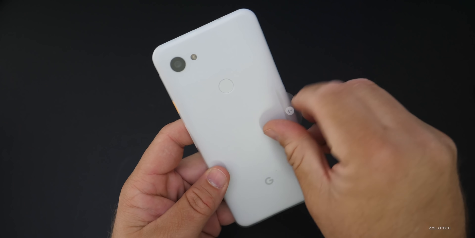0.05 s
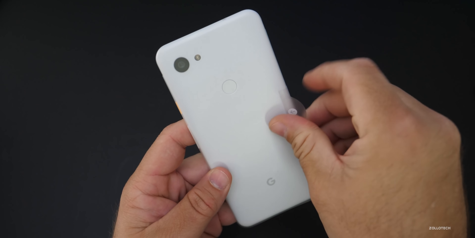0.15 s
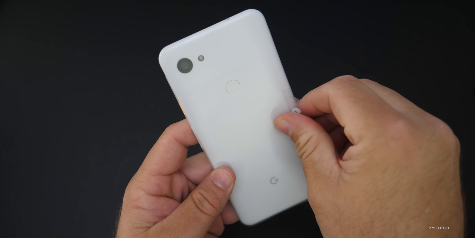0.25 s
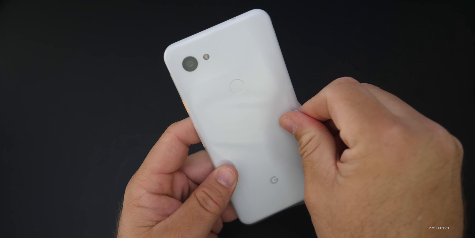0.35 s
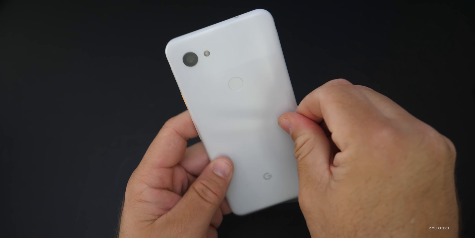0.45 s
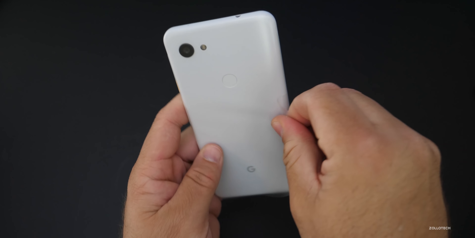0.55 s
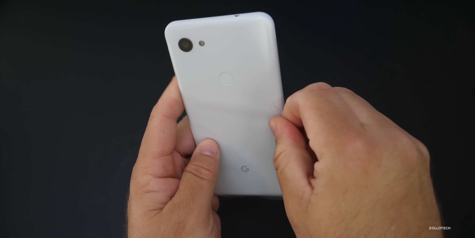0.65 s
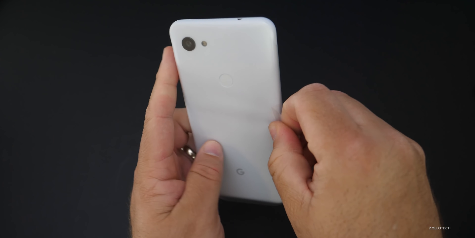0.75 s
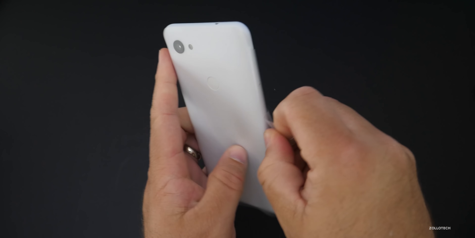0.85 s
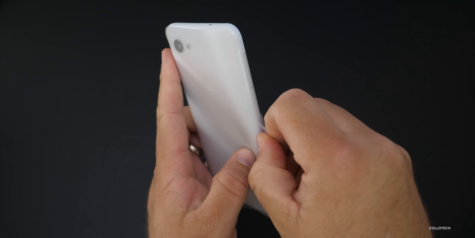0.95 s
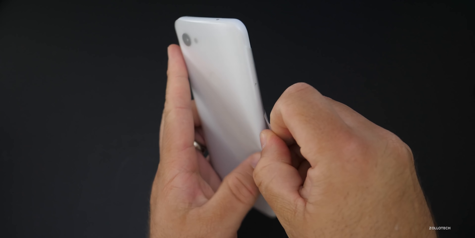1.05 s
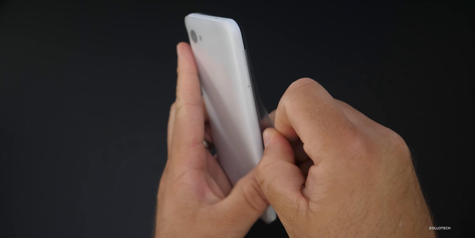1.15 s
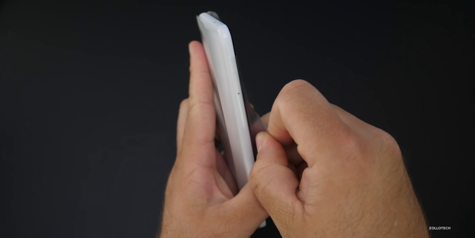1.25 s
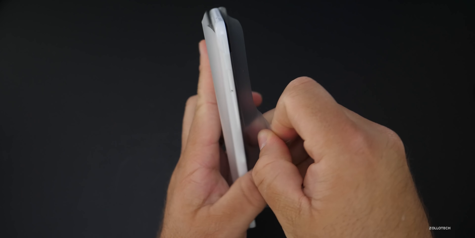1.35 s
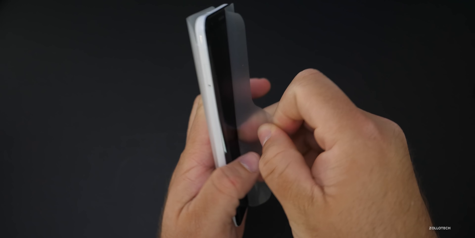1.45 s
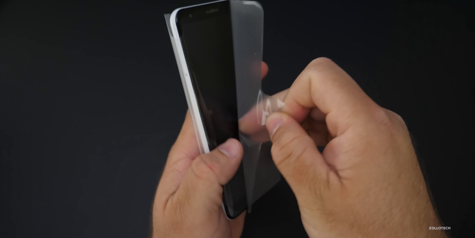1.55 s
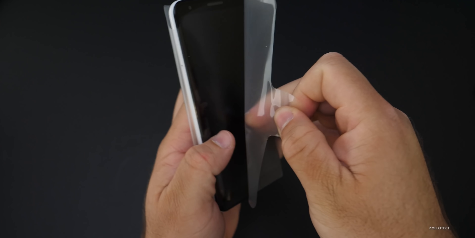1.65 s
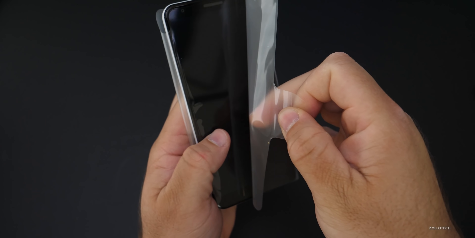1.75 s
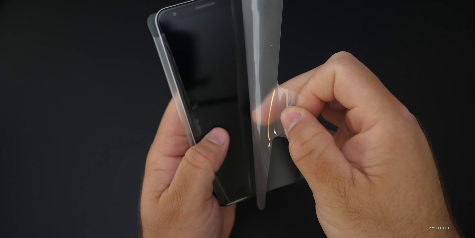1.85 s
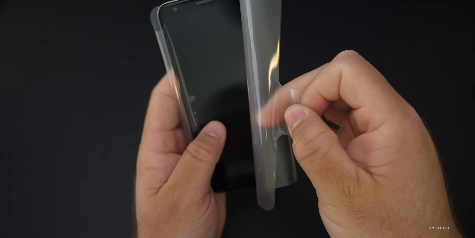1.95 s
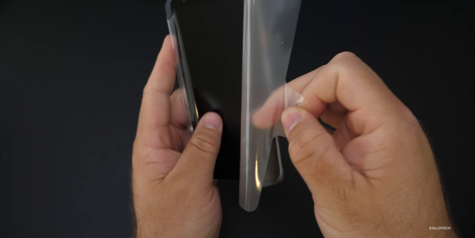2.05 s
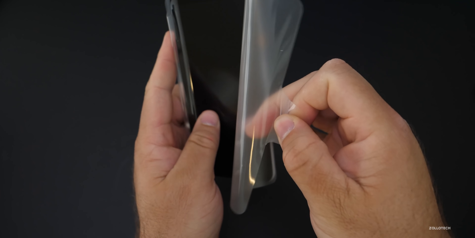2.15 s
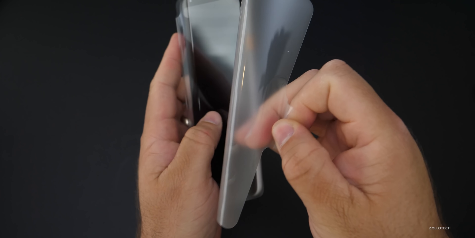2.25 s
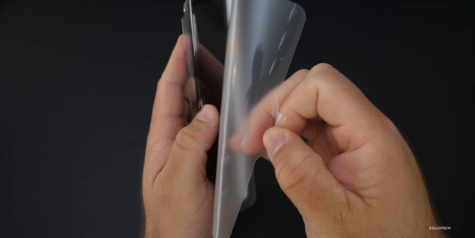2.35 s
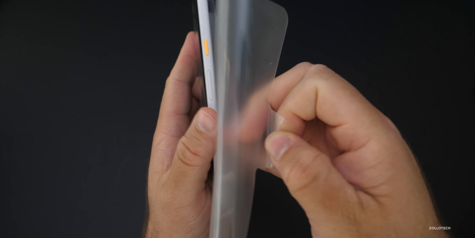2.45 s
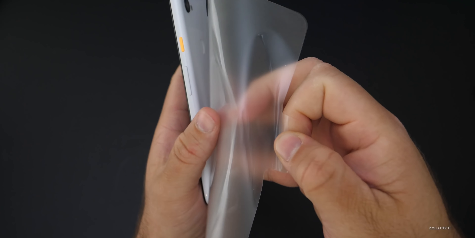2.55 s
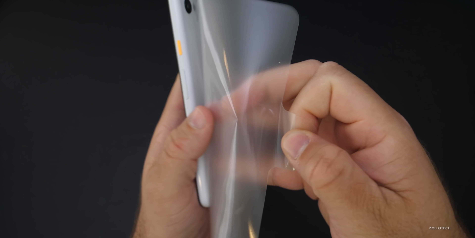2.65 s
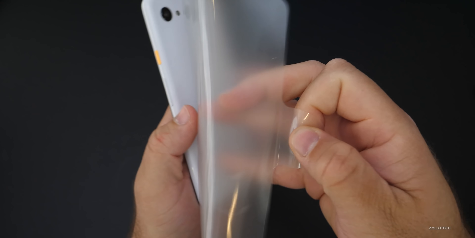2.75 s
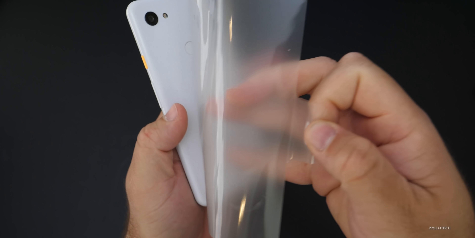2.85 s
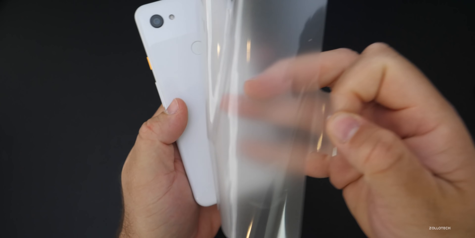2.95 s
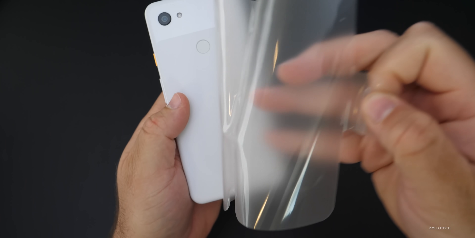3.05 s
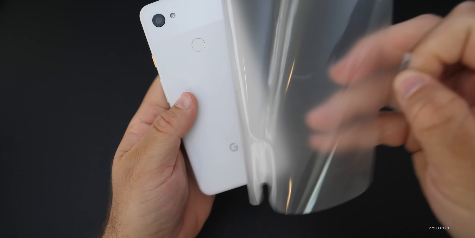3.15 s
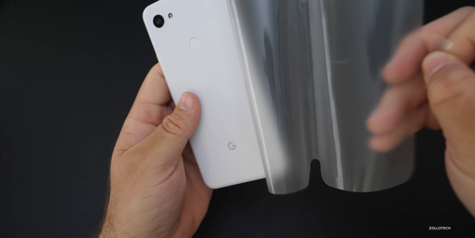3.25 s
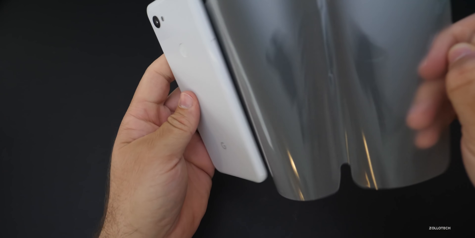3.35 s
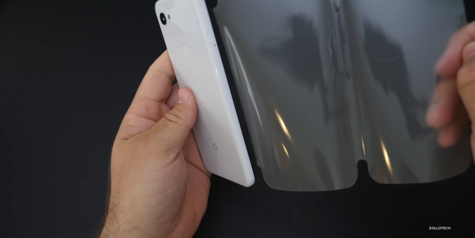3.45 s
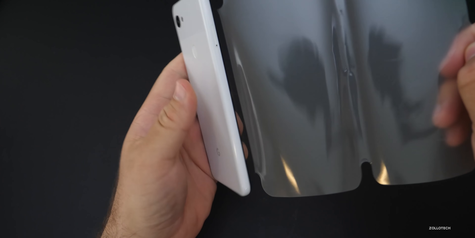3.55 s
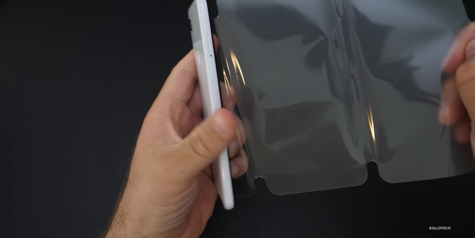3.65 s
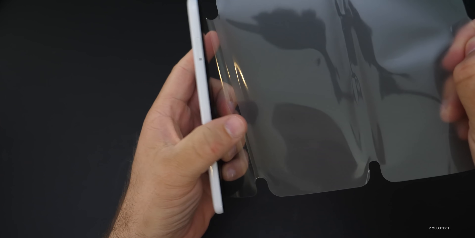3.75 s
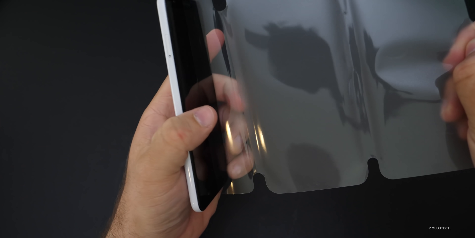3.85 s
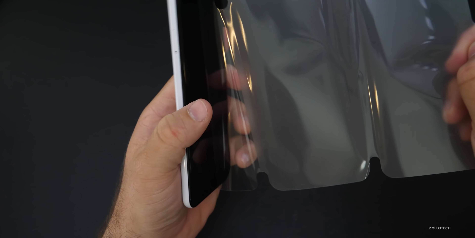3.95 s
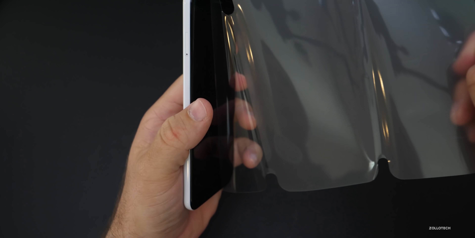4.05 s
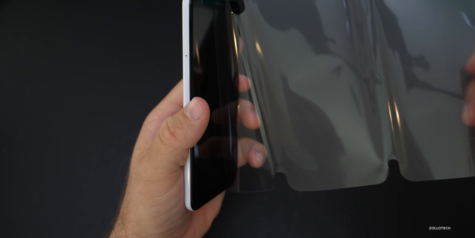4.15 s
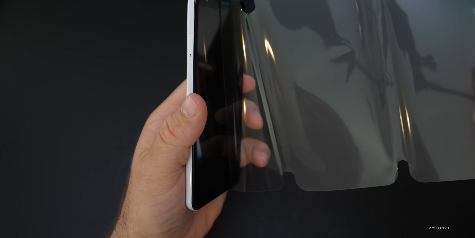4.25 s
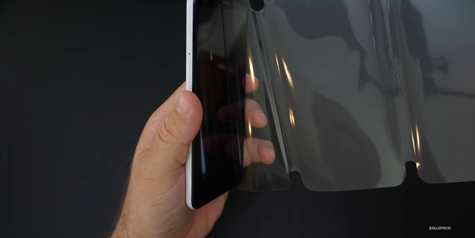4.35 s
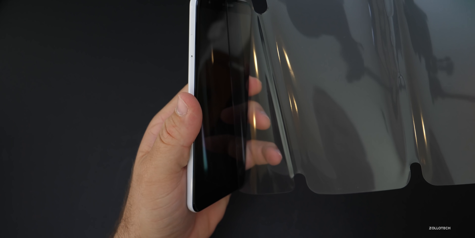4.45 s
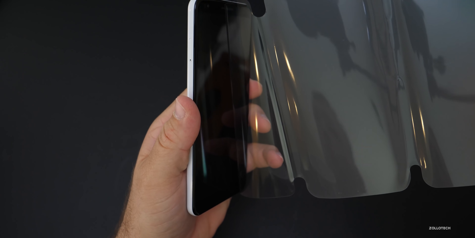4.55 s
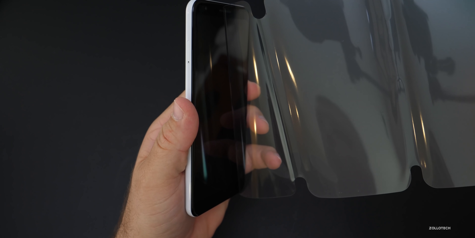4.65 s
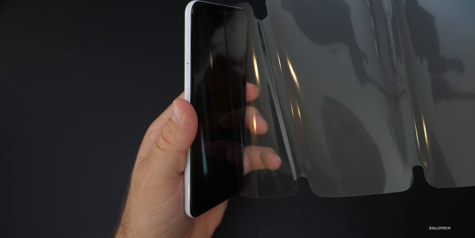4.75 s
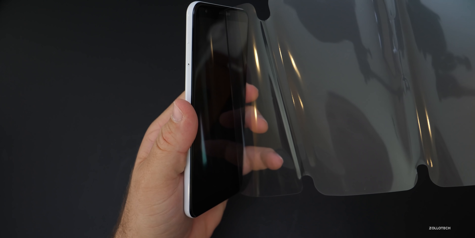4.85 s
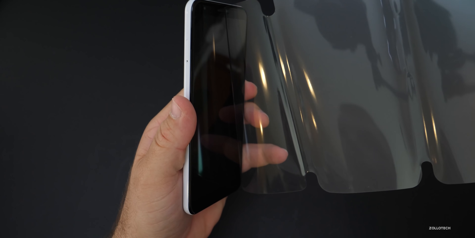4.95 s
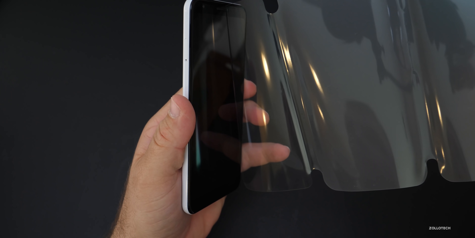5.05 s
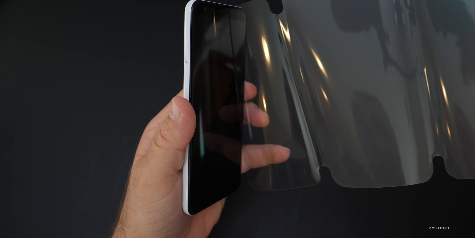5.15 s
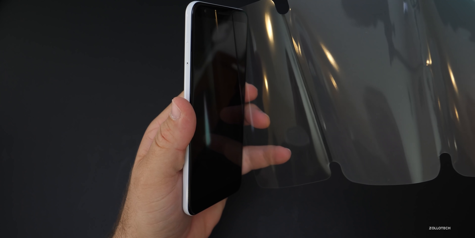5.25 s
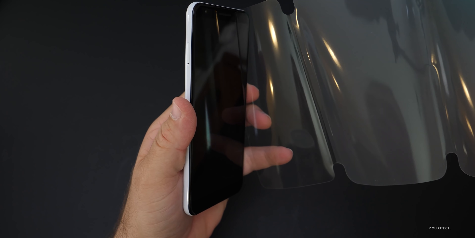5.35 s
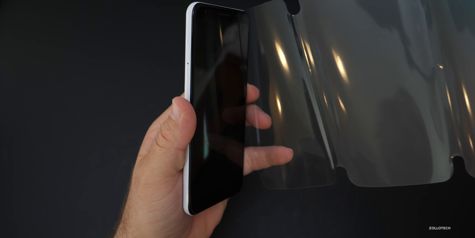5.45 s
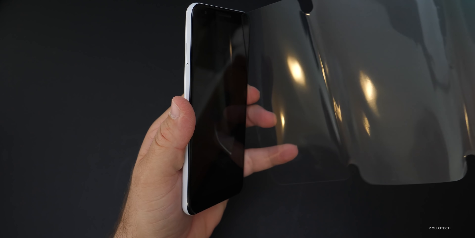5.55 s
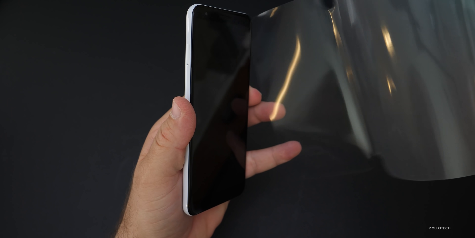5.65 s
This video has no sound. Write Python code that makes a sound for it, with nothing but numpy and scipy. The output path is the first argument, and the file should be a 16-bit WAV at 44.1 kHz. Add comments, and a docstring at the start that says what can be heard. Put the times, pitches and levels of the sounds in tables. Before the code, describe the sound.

Stiff clear plastic film snaps, crumples and rubs as it is pulled off a phone, then peels slowly in a fine run of tiny ticks.

```python
"""A clear plastic wrap is picked off a new phone, close to a microphone in a quiet small room.
First the stiff film snaps and crumples in pulses and bursts of noise; dull knocks ring the case, hands bump it.
Shoves of friction grains slide it over fingers and case, gliding bands of noise sing, and near 2.7 s it judders.
From about 4 s it peels slowly off the glass in a run of tiny ticks and larger pops, over a faint fizz.
A low mains hum, a sum of sines, and soft room noise lie underneath throughout."""
import sys
import numpy as np
from scipy import signal
from scipy.fft import rfft, irfft, next_fast_len
from scipy.io import wavfile
from scipy.ndimage import uniform_filter1d, map_coordinates

SR = 44100
rng = np.random.default_rng(int(sys.argv[2]) if len(sys.argv) > 2 else 0)


def put_to_file(sound):
    """Save the sound as 16-bit audio at rate SR, in the file named by the first command-line argument."""
    columns = np.atleast_2d(sound).T  # one column per channel
    safe = np.clip(columns, -1, 1)
    whole_steps = np.round(safe * 32767)
    wavfile.write(sys.argv[1], SR, whole_steps.astype(np.int16))


N = 251149
TIME = np.arange(N) / SR
LIFE = TIME[:SR // 4]  # the time axis of one decaying event


def amp(db):
    """Level: decibels become an amplitude ratio."""
    return 10 ** (np.asarray(db) / 20)


def unit(x):
    """Normalization by energy: scale to rms 1."""
    return x / np.sqrt(np.mean(x ** 2) + 1e-20)


def crest(x):
    """Normalization by peak: scale to a largest magnitude of 1."""
    return x / (np.abs(x).max() + 1e-20)


def along(points, hz):
    """Spectral interpolation: (Hz, value) points read on a logarithmic frequency axis."""
    point_hz, value = np.transpose(points)
    return np.interp(np.log(hz + 1), np.log(point_hz + 1), value)


def curves(rows):
    """Control curves: one value per sample for each column after the time."""
    time_s, *columns = np.transpose(rows)
    return [np.interp(TIME, time_s, column) for column in columns]


def during(rows, fade):
    """Gating: 1 while a table lasts, fading to 0 over fade seconds outside it."""
    first, last = rows[0][0], rows[-1][0]
    return np.interp(TIME, [first - fade, first, last, last + fade], [0, 1, 1, 0])


def add(track, s, x):
    """Superposition: mix x into the track from time s on."""
    start = max(round(s * SR), 0)
    part = track[start:start + len(x)]
    part += x[:len(part)]


def click(colour, ring_hz=1000, ring_db=0, width=1, size=2048):
    """Minimum phase: the causal pulse of a spectrum, peak 1, with one resonance (width in octaves)."""
    hz = np.fft.rfftfreq(size, 1 / SR)
    resonance = ring_db / (1 + (np.log2((hz + 1) / ring_hz) / width) ** 2)
    level = along(colour, hz) + resonance
    # folding the cepstrum onto positive time makes the pulse causal
    cepstrum = irfft(np.log(amp(level)))
    cepstrum[1:size // 2] *= 2
    cepstrum[size // 2 + 1:] = 0
    return crest(irfft(np.exp(rfft(cepstrum))))


def through(x, pulse):
    """Convolution: x excites a system with this impulse response."""
    return signal.fftconvolve(x, pulse)[:len(x)]


def dispersed(pulse, lag):
    """Dispersion: bending waves spread in a sheet, low notes last; lag is the delay in s at 4 kHz."""
    hz = np.fft.rfftfreq(len(pulse), 1 / SR)
    phase = 4 * np.pi * lag * np.sqrt(hz * 4000)
    return crest(irfft(rfft(pulse) * np.exp(-1j * phase)))


def dying(pulse, t60):
    """Exponential decay: noise of a pulse's colour, scaled to rms 1, loses 60 dB in t60 seconds."""
    noise = unit(through(rng.standard_normal(len(LIFE)), pulse))
    return noise * amp(-60 * LIFE / t60)


def wobble(rate):
    """Slow random modulation: a smooth curve through rate random knots a second."""
    knots = rng.standard_normal(int(N * rate / SR) + 4)
    return map_coordinates(knots, [TIME * rate])


def grains(colour, rate, spread_db):
    """Shot noise: random tiny contacts of uneven size, about rate a second, rms 1."""
    sizes = rng.standard_normal(N) * amp(spread_db * rng.standard_normal(N))
    contacts = rng.random(N) < rate / SR
    return unit(through(sizes * contacts, click(colour)))


def slips(rate, peak_db, jitter, spread_db):
    """Stick-slip: tension builds and lets go at an uneven rate; a longer hold gives a larger slip."""
    hold = np.exp(jitter * wobble(90))
    slip_count = np.floor(np.cumsum(rate / hold) / SR)
    at = np.flatnonzero(np.diff(slip_count))
    pulses = np.zeros(N)
    pulses[at] = hold[at] * amp(peak_db[at] + spread_db * rng.standard_normal(len(at)))
    return pulses


# spectrum of a buckling fold; smaller folds sound higher: pitch_multiple [of the ring pitch], level_db [dB]
FOLD_SPECTRUM = [(.03, -20), (.16, -15), (.42, -15.5), (.7, -1.5), (1, 1), (1.35, -1.5), (1.75, -6),
                 (2.3, -11.5), (3.3, -19.5), (5, -30)]


def fold(hz, ring_db, width):
    """Scaling: the whole spectrum of a fold moves with its ring pitch hz."""
    return click([(multiple * hz, db) for multiple, db in FOLD_SPECTRUM], hz, ring_db, width)


# spectrum of a knock on the phone case: frequency_hz [Hz], level_db [dB]
KNOCK_SPECTRUM = [(40, -7.5), (160, -0.5), (280, -7), (500, -8), (800, -10.5), (1400, -7), (2500, -12),
                  (6000, -53.5)]
# the film buckles; base levels, trimmed in snaps():
# start_s [s], level_db [dB], pitch_hz [Hz], knock_db [dB against level], shiver_db [dB against level]
SNAP_EVENTS = [(0.1213, -18, 3250, -46, -8.5), (0.1623, -23, 3570, -31, -6.5),
               (0.186, -16.5, 3530, -49, -17), (0.3037, -43.5, 4370, -10, -1),
               (0.512, -34, 5500, -32, -6.5), (0.6307, -32.5, 5840, -47, -1),
               (0.8871, -24.5, 5130, -32.5, -13), (0.9148, 5.5, 4660, -38, -50.5),
               (1.1506, -16.5, 5900, -50, -8.5), (1.2057, -25.5, 3450, -36, -27),
               (1.2263, -19.5, 4500, -29, -20), (1.241, -20.5, 4220, -45, -12.5),
               (1.3462, -18.5, 3850, -20.5, -9), (1.3747, -18.5, 3600, -38, -12),
               (1.422, -20.5, 3710, -32, -28), (1.4823, -25.5, 3940, -52, -14),
               (1.6184, -1.5, 3470, -53, -12), (1.6605, -16.5, 3180, -20, -2),
               (1.9689, -27.5, 3780, -19.5, -18), (2.029, -27, 3360, -15, -6),
               (2.0353, -26.5, 4100, -20, -1), (2.052, -22, 4100, -29, -17), (2.148, -23, 3700, -19, -6),
               (2.5154, -19, 4600, -23, -10), (2.5235, -24, 3000, -40, -8.5), (2.6246, -25, 3600, -35, -3),
               (2.6537, -10, 4300, -35, -40), (2.7274, -21.5, 4400, -45, -16),
               (2.9518, -31.5, 3220, -23, -5.5), (3.2032, -30, 1750, -12.5, -19),
               (3.2857, -11.5, 3230, -18, -8), (3.481, -32, 2310, -12, -10.5)]


def snaps(snap_db=-1, ring_db=4, width=0.32, lag=0.00052,
          sheet_db=-3, sheet_t60=0.029, knock_db=0, knock_t60=0.049):
    """Buckling: a fold flips in a millisecond; the rest of the sheet shivers and the phone takes a knock."""
    out, case = np.zeros(N), click(KNOCK_SPECTRUM)
    for s, db, hz, low_db, shiver_db in SNAP_EVENTS:
        crack = dispersed(fold(hz, ring_db, width), lag)
        shiver = amp(sheet_db + shiver_db) * dying(crack, sheet_t60)
        knock = amp(knock_db + low_db) * dying(case, knock_t60)
        add(out, s, amp(db + snap_db) * crack)
        add(out, s, amp(db) * (shiver + knock))
    return out


# many folds give way at once:
# peak_s [s], rise_s [s], t60_s [s], level_db [dB, rms at the peak], knock_db [dB against the crackle]
CRUMPLE_EVENTS = [(.009, 0.0068, 0.0093, -23.5, -8.5), (0.185, 0.0012, 0.0032, -24, 1),
                  (0.922, 0.008, 0.018, -34, -22), (1.172, 0.0024, 0.037, -22.5, -25),
                  (1.374, 0.00074, 0.024, -24.5, -12), (1.6172, 0.0045, 0.04, -27.5, -11),
                  (1.6282, 0.00096, 0.0052, -10, -19.5), (1.632, 0.00079, 0.025, -15, -6.5),
                  (2.05, 0.0075, 0.028, -36, -7)]


def crumples(ring_hz=4300, ring_db=-2, width=1.0):
    """Crackling noise: folds too close together to hear apart build up, then die away."""
    crackle = unit(through(rng.standard_normal(N), fold(ring_hz, ring_db, width)))
    knock = grains(KNOCK_SPECTRUM, rate=6500, spread_db=1)
    out = np.zeros(N)
    for s, rise, t60, db, low_db in CRUMPLE_EVENTS:
        near = np.abs(TIME - s) < LIFE[-1]
        age = TIME[near] - s
        growth = np.exp(np.minimum(age, 0) / rise)
        decay = amp(-60 * np.maximum(age, 0) / t60)
        out[near] += amp(db) * growth * decay * (crackle[near] + amp(low_db) * knock[near])
    return out


def patchy(x, depth_db):
    """Time-varying filtering: the bending sheet favours other frequencies from moment to moment."""
    spectrogram = signal.stft(x, nperseg=512)[2]
    field = rng.standard_normal(spectrogram.shape)
    field = uniform_filter1d(field, size=6, axis=0)  # smooth over frequency
    field = uniform_filter1d(field, size=7, axis=1)  # smooth over time
    return unit(signal.istft(spectrogram * amp(depth_db * unit(field)), nperseg=512)[1][:N])


# friction spectra of the rub, the higher hiss and the low flutter: frequency_hz [Hz], level_db [dB]
RUB_SPECTRUM = [(600, -34.5), (1800, -15.5), (2800, -3.5), (4400, 3), (6500, -6.5), (9000, -27),
                (16000, -45.5)]
HISS_SPECTRUM = [(3000, -24.5), (6000, 0), (9200, -1.5), (13000, -10), (16000, -7)]
FLUTTER_SPECTRUM = [(100, 4.5), (300, -6), (700, -2.5), (1400, 1.5), (2000, 3.5), (3500, -15.5),
                    (8000, -53.5)]
# one shove of the film over skin and case: top_speed_s [s], speed_up_s [s], slow_down_s [s],
# rub_db [dB], hiss_db [dB against the rub], flutter_db [dB against the rub]
STROKE_EVENTS = [(.01, 0.024, 0.019, -57, -26, 6), (0.093, 0.056, 0.082, -45, -8, -4.5),
                 (.18, 0.044, 0.22, -65.5, -3.5, -19), (.39, .05, 0.062, -57.5, -1.5, -11),
                 (.52, 0.11, 0.11, -58.5, -2.5, -14), (.66, 0.21, 0.21, -56, -1.5, -34),
                 (.93, 0.23, .13, -59.5, 4.5, -7), (.95, 0.029, 0.11, -46.5, 6.5, -8.5),
                 (1.141, 0.049, 0.12, -48.5, 2.5, -17), (1.22, 0.045, 0.053, -41, -10, -8.5),
                 (1.32, 0.11, 0.079, -47.5, 1, -15.5), (1.47, .1, 0.11, -52.5, -8.5, -14),
                 (1.63, 0.1, 0.088, -40.5, -9.5, -12), (1.775, 0.04, 0.029, -51, 1.5, -2.5),
                 (1.84, 0.087, 0.094, -43.5, -4.5, -13), (2.04, 0.18, 0.17, -46, -4, -12),
                 (2.12, .06, 0.07, -43, -6.5, -12), (2.23, 0.13, 0.089, -48, -13.5, -10),
                 (2.32, 0.08, 0.084, -45, -7, -8.5), (2.5, 0.14, 0.076, -45.5, -4.5, -9),
                 (2.62, 0.12, 0.27, -41, -7, -12.5), (2.77, 0.13, 0.11, -33, -6.5, -11),
                 (2.849, 0.089, 0.11, -44, -4.5, -13.5), (2.975, 0.063, 0.038, -48.5, -3.5, -11),
                 (3.17, 0.045, 0.037, -74.5, -20.5, 12.5), (3.25, 0.065, 0.037, -67.5, -3, -9),
                 (3.345, 0.086, 0.046, -52, -5.5, -6), (3.4, 0.031, 0.057, -54, -10.5, -8.5),
                 (3.585, .025, 0.017, -69, 6.5, -15.5), (3.675, 0.028, 0.033, -78.5, -8.5, 13.5),
                 (3.738, .04, 0.1, -59.5, -7, -6), (3.89, 0.15, 0.19, -56, -6, -17)]
# between shoves the film still brushes the fingers, less once it hangs free: time_s [s], level_db [dB]
BRUSH_CURVE = [(0, -72), (1.05, -69), (1.7, -54), (2.9, -67.5), (3.03, -71.5), (3.65, -76), (4.05, -81)]


def sliding(rub_db=0, hiss_db=0, flutter_db=0, grip_db=1, speed_power=1.97,
            brush_hiss_db=-9, brush_flutter_db=-8):
    """Sliding friction: dense grains, louder the faster a shove goes, under a varying grip."""
    brush_db = curves(BRUSH_CURVE)[0] + np.array([[0], [brush_hiss_db], [brush_flutter_db]])
    power = amp(brush_db) ** 2
    for s, rise, fall, db, high_db, low_db in STROKE_EVENTS:
        on = (TIME > s - rise) & (TIME < s + fall)
        speed = np.sin(np.pi * np.interp(TIME[on], [s - rise, s, s + fall], [0, .5, 1]))
        top = amp([[db], [db + high_db], [db + low_db]])
        power[:, on] += (top * speed ** speed_power) ** 2
    rub, hiss, flutter = np.sqrt(power)
    rubbing = patchy(grains(RUB_SPECTRUM, rate=6500, spread_db=3), depth_db=2.2)
    hissing = patchy(grains(HISS_SPECTRUM, rate=9000, spread_db=2.5), depth_db=2)
    fluttering = grains(FLUTTER_SPECTRUM, rate=2500, spread_db=4.5)
    sound = amp(rub_db) * rub * rubbing + amp(hiss_db) * hiss * hissing
    sound += amp(flutter_db) * flutter * fluttering
    # while the sheet judders it is stuck for half of the time
    free = 1 - .5 * sum((TIME > start) & (TIME < end) for start, end, *_ in JUDDER_EVENTS)
    return sound * free * amp(grip_db * wobble(70)) * during(BRUSH_CURVE, fade=0.03)


# a taut span of film sings under friction, its pitch following the tension:
# start_s [s], end_s [s], start_hz [Hz], end_hz [Hz], width_hz [Hz], level_db [dB]
SWISH_EVENTS = [(1.281, 1.34, 8700, 8940, 910, -53), (2.029, 2.136, 4530, 4240, 1200, -45),
                (2.26, 2.365, 3440, 3210, 1100, -48), (2.959, 3.003, 3490, 3050, 1000, -51.5),
                (3.297, 3.381, 3780, 3670, 898, -53), (3.715, 3.88, 2510, 1920, 707, -66),
                (3.935, 4.063, 2036, 1470, 865, -65.5)]


def swishes(rough_db=2.5):
    """Quadrature modulation: two slow noises on a gliding carrier make a narrow, rough friction band."""
    out = np.zeros(N)
    for start, end, start_hz, end_hz, width_hz, db in SWISH_EVENTS:
        on = (TIME > start) & (TIME < end)
        progress = (TIME[on] - start) / (end - start)
        phase = 2 * np.pi * np.cumsum(start_hz + (end_hz - start_hz) * progress) / SR
        band = wobble(width_hz)[on] * np.cos(phase) + wobble(width_hz)[on] * np.sin(phase)
        out[on] += amp(db) * np.sqrt(np.sin(np.pi * progress)) * band
    return out * unit(amp(rough_db * wobble(170)))


# spectrum of one slip on the case: frequency_hz [Hz], level_db [dB]
SLIP_SPECTRUM = [(200, -12), (1000, -32.5), (1800, -6.5), (2600, 1.5), (3300, -0.5), (3900, -11),
                 (4800, -2), (6500, -16), (9300, -14.5), (15000, -33.5)]
# the sheet sticks and slips on the case: start_s [s], end_s [s],
# first_rate [slips per s], last_rate [slips per s], level_db [dB, nominal peak], pitch_hz [Hz]
JUDDER_EVENTS = [(2.707, 2.72, 310, 280, -19.5, 4680), (2.738, 2.8, 230, 520, -20, 2500)]


def judder(edge_db=-3, ring_db=4, width=.4):
    """Stick-slip vibration: zipping creaks swell and fade as the sheet drags and its slip rate glides."""
    out = np.zeros(N)
    for start, end, first_rate, last_rate, db, hz in JUDDER_EVENTS:
        progress = np.clip((TIME - start) / (end - start), 0, 1)
        rate = first_rate * (last_rate / first_rate) ** progress
        peak = db + edge_db * (1 - np.sin(np.pi * progress))
        pulses = slips(rate, peak, jitter=.08, spread_db=1)
        creak = dispersed(click(SLIP_SPECTRUM, hz, ring_db, width), lag=.00025)
        out += through(pulses * (TIME > start) * (TIME < end), creak)
    return out


# spectra of one tick of the peel and of the ringing taut film: frequency_hz [Hz], level_db [dB]
TICK_SPECTRUM = [(150, -43), (600, -18), (1300, -8.5), (2400, -2), (3500, 0.5), (4500, 1.5), (7000, -8),
                 (9500, -13), (13000, -20), (16000, -17)]
SPAN_SPECTRUM = [(1500, -33), (2300, -12.5), (2950, -8.5), (3450, 2.5), (3850, 1.5), (4300, -15),
                 (7000, -42.5)]
# the peel front crosses the glass, stalls and picks up again:
# time_s [s], rate [nominal ticks per s], level_db [dB, nominal tick peak]
PEEL_CURVE = [(3.95, 125, -40.5), (4.46, 150, -41), (4.6, 85, -45), (4.85, 72, -44.5), (5.03, 135, -39),
              (5.37, 180, -38), (5.49, 85, -36.5), (5.69, 200, -38.5)]
# larger patches let go; base level, trimmed in peeling(): start_s [s], level_db [dB]
POP_EVENTS = [(4.0057, -29), (4.1161, -33), (4.1452, -29), (4.187, -30.5), (4.2557, -33.5), (4.273, -34),
              (4.3139, -32), (4.327, -29.5), (4.3807, -32.5), (4.4327, -33.5), (4.478, -36),
              (4.6135, -41.5), (4.7465, -28), (4.7715, -38.5), (4.821, -35), (4.8446, -39.5),
              (4.8641, -25.5), (4.895, -34), (4.9105, -36.5), (4.9362, -31), (4.988, -29), (5.064, -28.5),
              (5.2375, -28), (5.268, -33), (5.307, -29), (5.3267, -28), (5.3873, -32), (5.4433, -27.5),
              (5.582, -31.5), (5.6014, -25), (5.637, -33)]
# the freed film rings after each tick while it is taut: time_s [s], ring_share_db [dB against the tick]
TAUT_CURVE = [(4, -13), (4.15, -7), (4.4, -11), (4.55, -19), (4.92, -20.5), (5.2, -21)]


def peeling(tick_db=0, pop_db=-1, rings_hz=(2900, 3800, 4900), ring_db=5, width=0.12, lag=.0001, climb=.8,
            easy_ticks_per_s=146, fizz_db=-24, fizz_grows=1.8):
    """Adhesive fracture: the film leaves in small, fairly even jumps; the faster, the more the glue fizzes."""
    rate, peak = curves(PEEL_CURVE)
    pace = rate / easy_ticks_per_s
    moving, pops = during(PEEL_CURVE, fade=0.014), np.zeros(N)
    for s, db in POP_EVENTS:
        # the front is held for a beat before a larger patch lets go
        beat = 1 / np.interp(s, TIME, rate)
        moving[(TIME > s - beat) & (TIME < s)] = 0
        add(pops, s, amp([db + pop_db]))
    jumps = slips(rate, peak + tick_db, jitter=.2, spread_db=3)
    pulses = jumps * moving + pops
    taut = amp(curves(TAUT_CURVE)[0])
    # each jump rings the film at the pitch of its spot on the front, higher when the front runs fast
    place = len(rings_hz) * rng.random(N) + climb * np.log2(pace)
    spot = np.clip(np.floor(place), 0, len(rings_hz) - 1)
    ticks = np.zeros(N)
    for k, hz in enumerate(rings_hz):
        tick = dispersed(click(TICK_SPECTRUM, hz, ring_db, width), lag)
        ticks += through(pulses * (1 - taut) * (spot == k), tick)
    ring = through(pulses * taut, dispersed(click(SPAN_SPECTRUM), lag))
    fizz = amp(peak + fizz_db) * pace ** fizz_grows * grains(TICK_SPECTRUM, rate=1800, spread_db=2.5)
    return ticks + ring + fizz * moving


# dull knocks ring the case, some of them together with a snap; base level, trimmed in handling():
# start_s [s], level_db [dB], pitch_hz [Hz]
KNOCK_EVENTS = [(0.034, -38.5, 1290), (0.124, -33, 1160), (0.162, -30.5, 1000), (0.311, -41, 504),
                (0.348, -47.5, 1090), (0.411, -38.5, 1610), (0.678, -40, 645), (1.007, -36, 1690),
                (1.108, -43, 1800), (1.149, -26, 1340), (1.242, -32, 1360), (1.357, -37, 520),
                (1.563, -41, 2020), (1.813, -61, 2200), (2.11, -37, 2570), (2.34, -35, 1520),
                (2.622, -30, 1100), (2.832, -24.5, 2030), (3.841, -47, 770), (3.898, -44, 704)]
# the phone shifts in the hand; base level, trimmed in handling():
# start_s [s], level_db [dB], pitch_hz [Hz], t60_s [s]
BUMP_EVENTS = [(0.184, -25.5, 242, 0.018), (1.605, -31, 109, 0.029), (1.628, -20.5, 101, 0.056),
               (2.034, -41, 240, 0.078), (2.14, -34.5, 106.3, 0.18), (2.829, -29.5, 61.4, 0.25),
               (3.507, -37, 55.3, 0.098), (3.707, -32.5, 38, 0.17), (3.888, -49, 76.2, 0.49)]


def handling(knock_db=-1, knock_t60=0.02, ring_db=13, width=0.34, bump_db=1, rise=0.00083, thud_db=-8):
    """Damped resonance: dull knocks ring the case, some with a snap, and the hands give soft low bumps."""
    out = np.zeros(N)
    for s, db, hz in KNOCK_EVENTS:
        knock = crest(dying(click(KNOCK_SPECTRUM, hz, ring_db, width), knock_t60))
        add(out, s, amp(db + knock_db) * knock)
    flesh = click([(30, -7.5), (115, 0.5), (190, -12.5), (700, -30.0), (3000, -72.5)])  # (Hz, dB)
    onset = 1 - np.exp(-LIFE / rise)
    for s, db, hz, t60 in BUMP_EVENTS:
        sway = amp(-60 * LIFE / t60) * np.sin(2 * np.pi * hz * LIFE)
        thud = amp(thud_db) * dying(flesh, t60)
        add(out, s, amp(db + bump_db) * (sway + thud) * onset)
    return out


# near reflections from desk and walls: delay_s [s], level_db [dB]
REFLECTIONS = [(.0041, -33), (.0062, -20.5), (0.0112, -20), (0.0127, -20.5)]


def room(x, wet_db=-15, t60=0.28):
    """Reverberation: a few near reflections and a faint short tail of decaying noise join the direct sound."""
    answer = rng.standard_normal(len(LIFE)) * amp(-60 * LIFE / t60) * (1 - np.exp(-LIFE / 0.0012))
    answer *= amp(wet_db) / np.linalg.norm(answer)
    for delay, db in REFLECTIONS:
        add(answer, delay, amp([db]))
    return x + through(x, answer)


# spectrum of the room noise: frequency_hz [Hz], level_db [dB]
AIR_SPECTRUM = [(20, -3), (65, -2), (100, -5.5), (160, -20), (260, -18), (400, -24), (800, -29.5),
                (2000, -36), (6000, -36.5), (15000, -41)]
# mains hum, one entry for each multiple of the mains from the first up: level_db [dB, rms before the waver]
HUM_LEVELS = [-68, -59.5, -89.5, -78]


def background(air_db=-59.5, waver_db=0.73, mains_hz=60):
    """Harmonic series: mains multiples sum to a slightly wavering hum over low filtered room noise."""
    hum = np.zeros(N)
    for multiple, db in enumerate(HUM_LEVELS, 1):
        cycles = multiple * mains_hz * TIME + rng.random()
        hum += amp(db) * np.sqrt(2) * np.sin(2 * np.pi * cycles)
    air = unit(through(rng.standard_normal(N), click(AIR_SPECTRUM)))
    return hum * amp(waver_db * wobble(1.7)) + amp(air_db) * air


def scene():
    """Superposition: film and hands sound in the room, over the background."""
    film = snaps() + crumples() + handling() + sliding() + swishes() + judder() + peeling()
    return (room(film) + background())[None]


# response of the microphone: frequency_hz [Hz], level_db [dB]
MICROPHONE_RESPONSE = [(7500, -0.5), (9200, 3), (10100, -1.5), (10900, -11), (11700, -12), (12500, 4),
                       (13600, 0.5), (15000, -11.5), (16400, -19)]


def record(dry, top_hz=16500):
    """Frequency response: the microphone colours the treble, full scale clips, and the band ends at top_hz."""
    size = next_fast_len(N + SR // 4)
    hz = np.fft.rfftfreq(size, 1 / SR)
    response = amp(along(MICROPHONE_RESPONSE, hz))
    heard = np.clip(irfft(rfft(dry, size) * response, size), -1, 1)
    return irfft(rfft(heard) * (hz < top_hz), size)[:, :N]


dry = scene()
out = record(dry)
put_to_file(out)
```